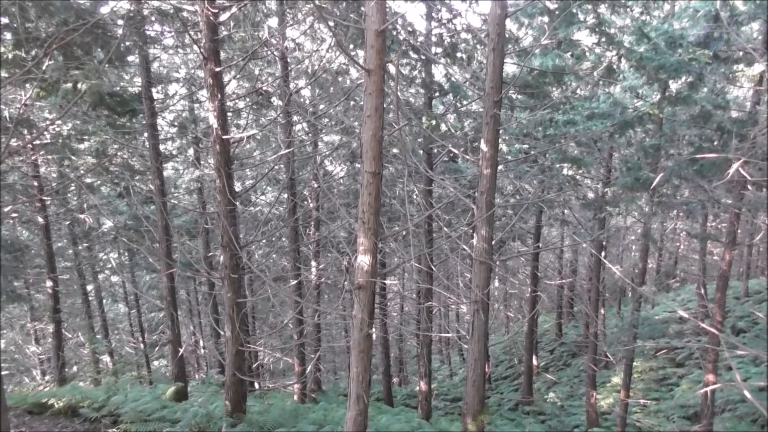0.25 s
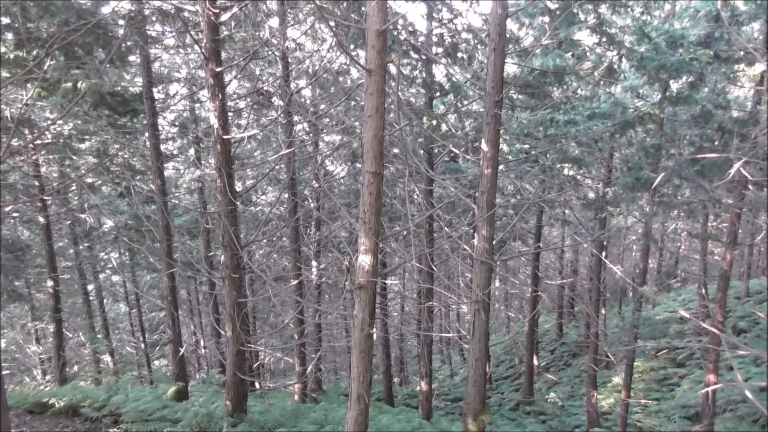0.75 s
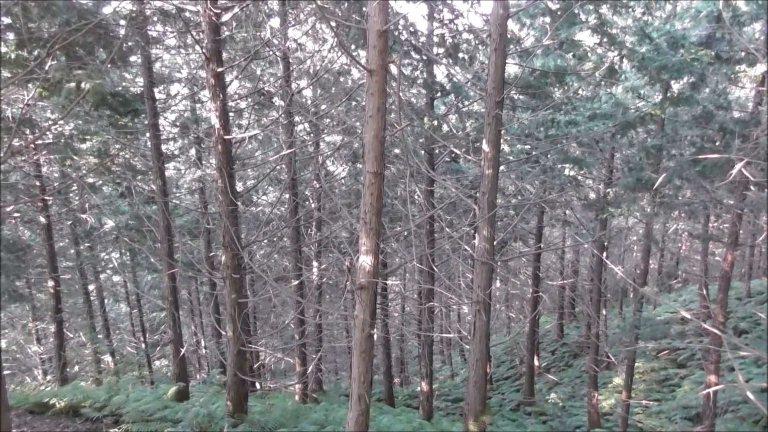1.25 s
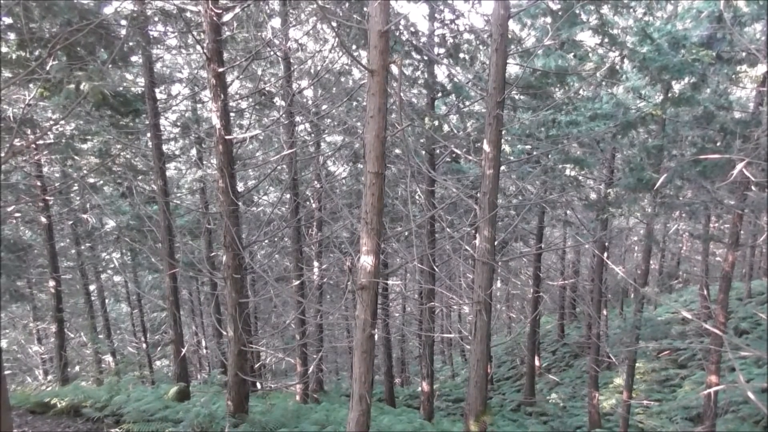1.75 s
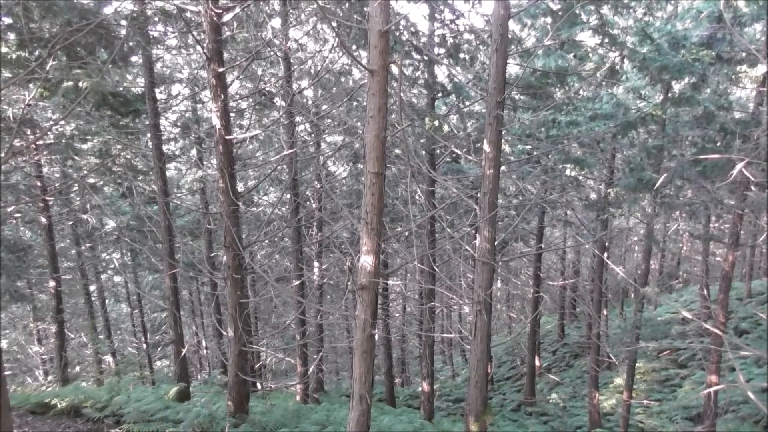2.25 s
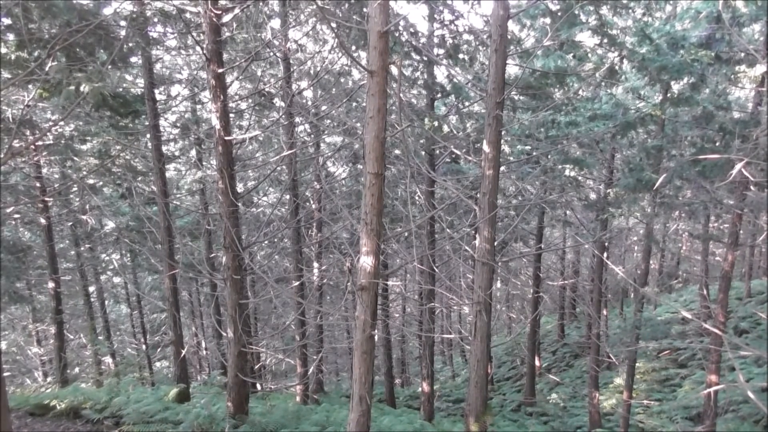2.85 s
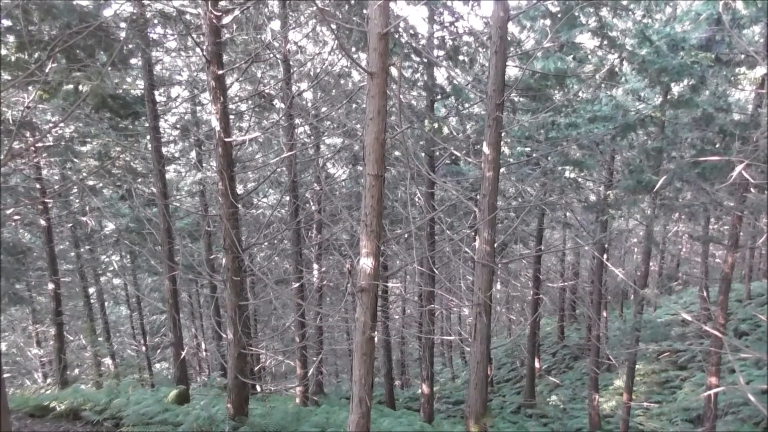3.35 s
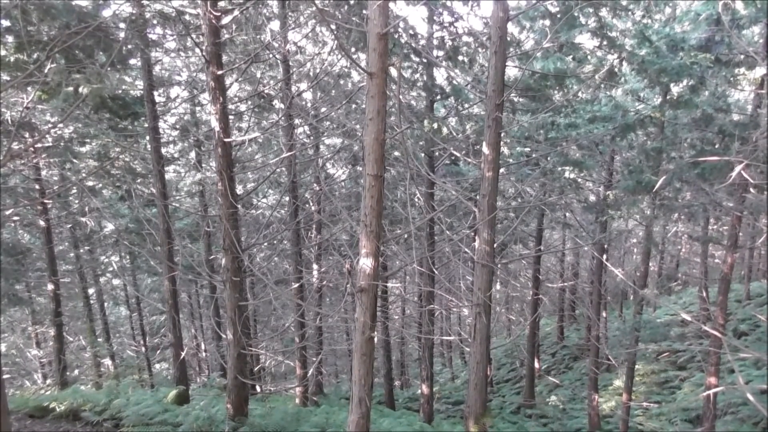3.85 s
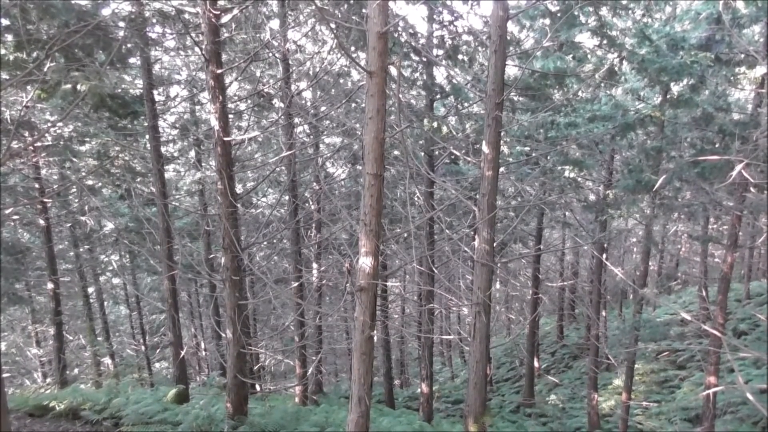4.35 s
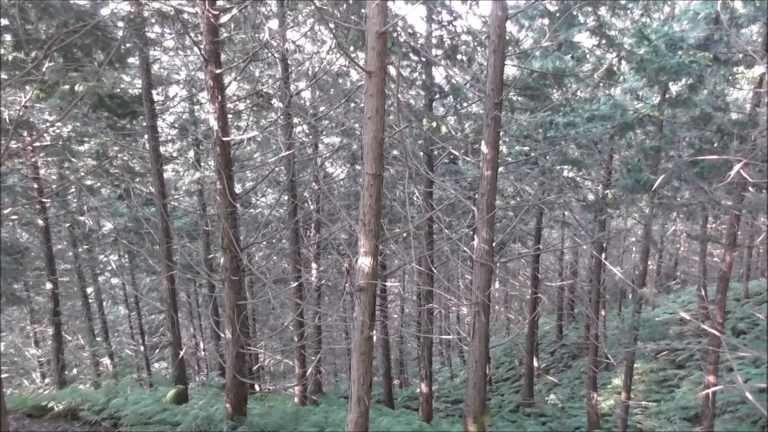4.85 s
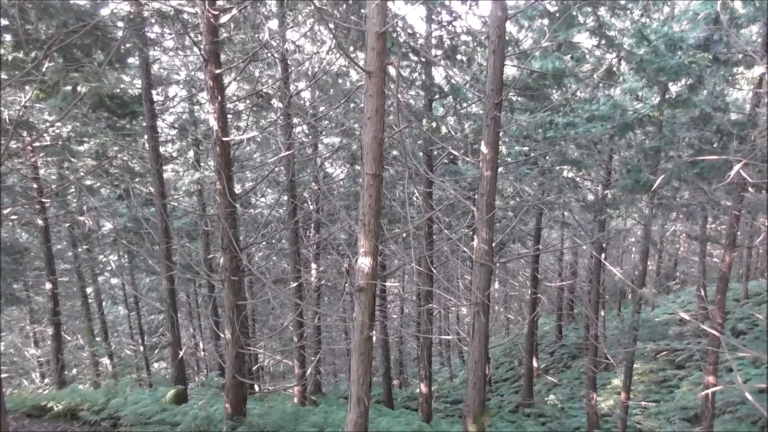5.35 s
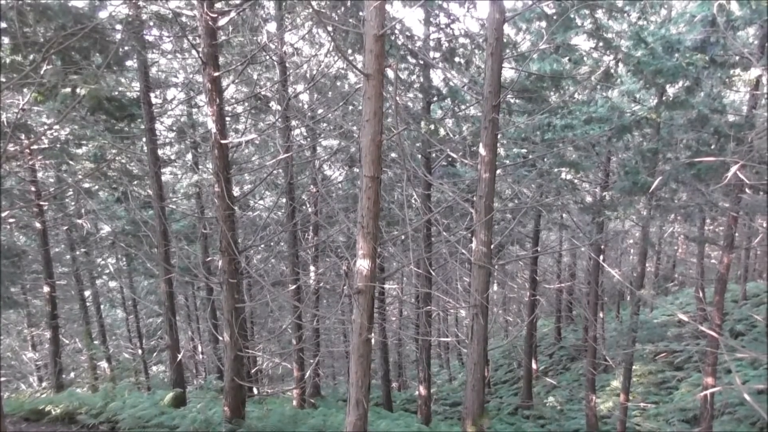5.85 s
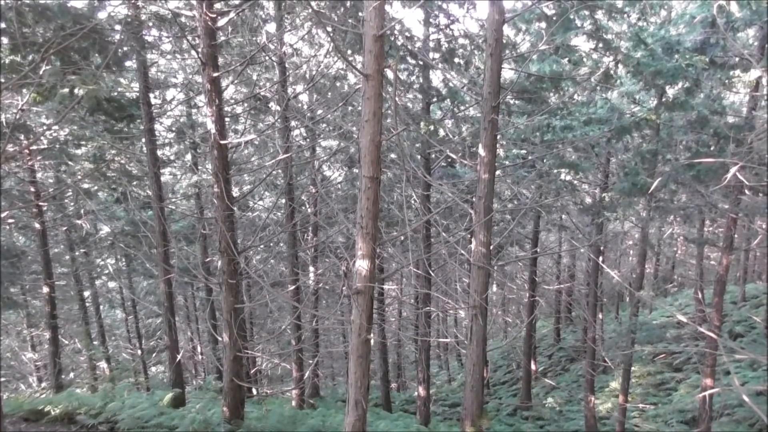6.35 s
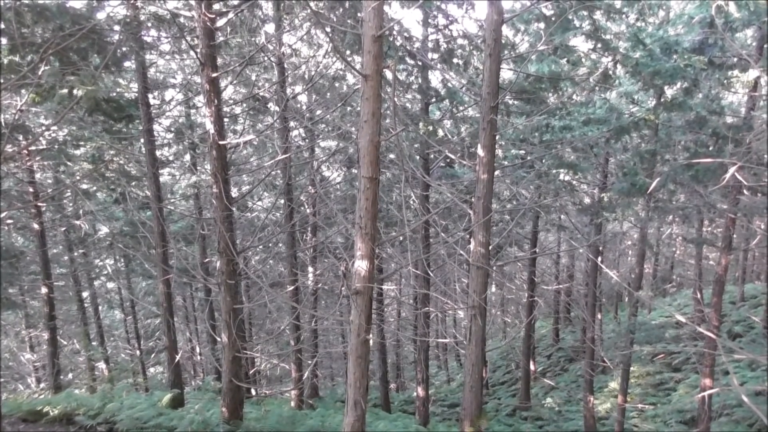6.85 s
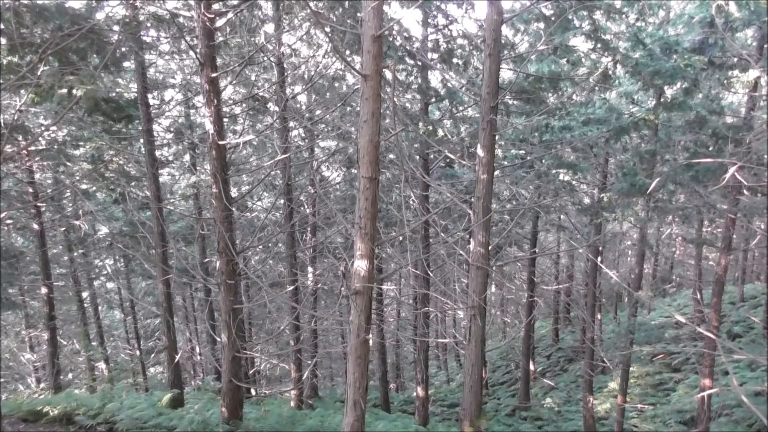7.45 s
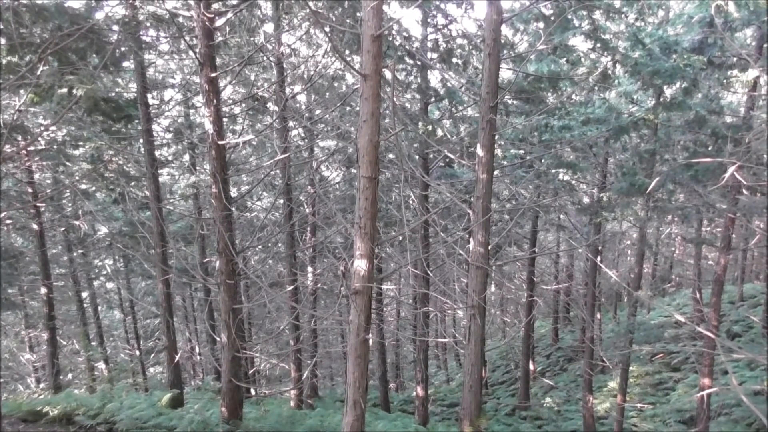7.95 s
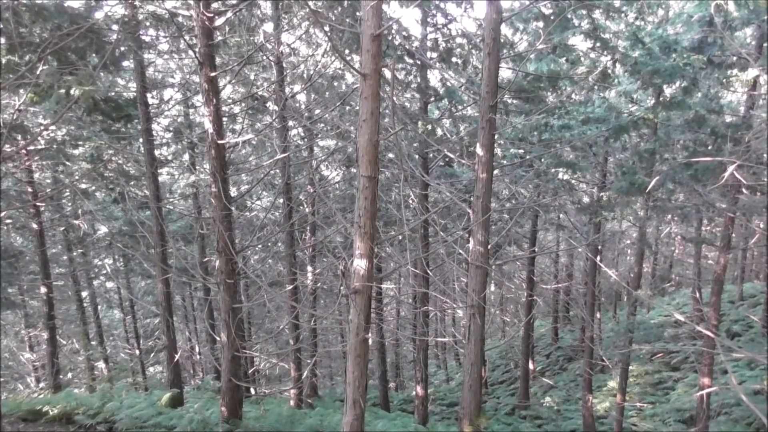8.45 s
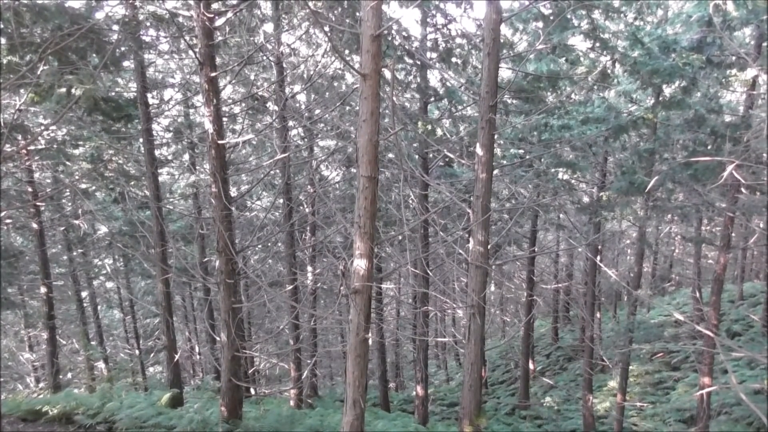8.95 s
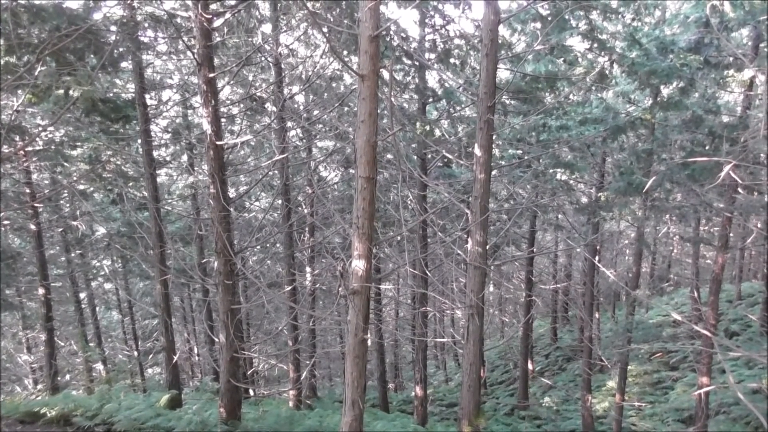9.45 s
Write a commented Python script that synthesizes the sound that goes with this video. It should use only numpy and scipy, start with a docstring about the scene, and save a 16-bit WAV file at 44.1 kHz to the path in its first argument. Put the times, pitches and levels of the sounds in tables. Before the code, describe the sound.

Cicadas in a conifer wood: a steady high sizzle, a throbbing distant chorus, and close raspy pulsing calls that overlap, swell and fade.

```python
"""A steady insect sizzle high above and a throbbing far chorus of cicadas open an evening in a conifer wood.
The sizzle is noise gated by fast clicks; the chorus sums pulsed partials of far males over coloured noise.
Near males overlap one another with ringing trains of about twelve syllables a second, each harmonic partials
with a tymbal rasp that scatters among the trunks. Filtered noise makes the low stir of air, and two drifting
sines make a distant engine that slowly climbs in pitch."""
import sys
import numpy as np
from scipy import signal
from scipy.fft import rfft, irfft, next_fast_len
from scipy.io import wavfile
from scipy.ndimage import uniform_filter1d, minimum_filter1d

SR = 44100
rng = np.random.default_rng(int(sys.argv[2]) if len(sys.argv) > 2 else 0)


def generate_wav(signal):
    """Clip the signal to [-1, 1] and save it as 16-bit WAV at the path in sys.argv[1]."""
    frames = np.transpose(np.atleast_2d(signal))
    scaled = np.clip(frames, -1, 1) * 32767
    pcm = np.round(scaled).astype(np.int16)
    wavfile.write(sys.argv[1], SR, pcm)


N = 427329  # samples


def amp(db):
    """Logarithmic level: 20 dB is a tenfold gain in amplitude."""
    return 10 ** (np.asarray(db) / 20)


def unit(x):
    """Normalization to equal power: rms 1 over all channels."""
    return x / np.sqrt(np.mean(x ** 2) + 1e-20)


def along(points, hz):
    """Interpolation of (frequency [Hz], value) points on a logarithmic frequency axis."""
    f, v = np.transpose(points)
    return np.interp(np.log(hz + 1), np.log(f + 1), v)


def shape(points, hz):
    """Spectral envelope: gain from (frequency [Hz], level [dB]), falling 60 dB an octave beyond its ends."""
    nearest = np.clip(hz, points[0][0], points[-1][0])
    octaves = np.abs(np.log2((hz + 1) / (nearest + 1)))
    return amp(along(points, hz) - 60 * octaves)


def curves(rows):
    """Temporal envelopes: one interpolated value per sample for each column after the time."""
    s, *cols = np.transpose(rows)
    return [np.interp(np.arange(N) / SR, s, c) for c in cols]


def wobble(rate, size=N):
    """Band-limited random modulation: a smooth curve through Gaussian knots, rate knots a second."""
    at = np.arange(size) * rate / SR
    k = at.astype(int)
    knots = rng.standard_normal(int(at[-1]) + 2)
    u = at - k
    return knots[k] + (knots[k + 1] - knots[k]) * u * u * (3 - 2 * u)


def filtered(x, response):
    """Linear filtering: the spectrum is multiplied by a response of frequency."""
    n = x.shape[-1]
    m = next_fast_len(n + SR // 10, True)
    spectrum = rfft(x, m)
    return irfft(spectrum * response(np.fft.rfftfreq(m, 1 / SR)), m)[..., :n]


def spread(pair):
    """Spatial coherence: two signals, as mid and side, make a diffuse field at closely spaced microphones."""
    # (frequency [Hz], side gain [dB])
    side_gain = [(25, 16), (60, 8.5), (130, 0.5), (500, 2.5), (1200, 0), (2100, -6), (3000, -43),
                 (4200, -12), (6000, -20), (8200, -10), (11000, 8)]
    side = filtered(pair[1], lambda hz: amp(along(side_gain, hz)))
    return np.array([pair[0] + side, pair[0] - side])


def wash(spectrum, gate=1):
    """Subtractive synthesis: two unrelated noises, gated, then coloured, at rms 1."""
    noise = gate * rng.standard_normal((2, N))
    return unit(filtered(noise, lambda hz: shape(spectrum, hz)))


def wood(x):
    """Reverberation by scattering among the trunks: two unrelated noise tails, each band decaying exponentially."""
    # Decay by 60 dB: (frequency [Hz], decay time [s])
    decay_time = [(500, 0.58), (4000, 0.53), (10000, 0.15)]
    hz, t, z = signal.stft(rng.standard_normal((2, SR // 2)), SR, nperseg=256)
    decay = amp(-60 * t / along(decay_time, hz)[:, None])
    tail = signal.istft(z * decay, SR, nperseg=256)[1]
    return signal.fftconvolve(x[None], tail / np.linalg.norm(tail[0]), axes=1)[:, :N]


def sizzle(level_db=-1, click_hz=520, depth=0.18, whine_db=-2, ripple_db=2.1):
    """Amplitude-modulated noise: the second species' fast tymbal clicks blur into a hiss with thin whining tones."""
    # Hiss colour: (frequency [Hz], level [dB])
    hiss_spectrum = [(3530, -45), (6000, -10.5), (6750, -4.5), (7950, 4), (8500, 3.5), (9040, -3.5),
                     (9250, -7.5), (10700, -21.5), (11100, -35), (14400, -27), (22000, -120)]
    # Hiss before the common gain: (time [s], level [dB])
    hiss_level = [(0.0, -19), (0.75, -17.5), (2.13, -17.5), (3.91, -21), (6.04, -19), (6.64, -20.5),
                  (8.07, -16.5), (9.36, -21), (9.69, -17.5)]
    # Thin tones, relative to the whine's level: (frequency [Hz], level [dB])
    whine_tones = [(8700, -56), (8819, -31), (9135, -48), (9224, -38.5), (9431, -41.5), (9624, -62),
                   (9755, -51)]
    # Whine before its common gain: (time [s], level [dB])
    whine_level = [(0, 7.5), (1.2, 7), (2.2, -3.5), (4.5, -5), (6, 3), (7.5, -5), (9.69, -14)]

    click_phase = 2 * np.pi * np.cumsum(click_hz + 12 * wobble(3)) / SR
    gate = amp(0.31 * wobble(700)) * (1 + depth * np.sin(click_phase))
    hiss_db = curves(hiss_level)[0] + level_db + 0.54 * wobble(24)
    hiss = amp(hiss_db) * wash(hiss_spectrum, gate)
    # Echoes from the trunks leave a fixed fine ripple on the spectrum.
    ripple_hz, ripple = np.linspace(0, SR / 2, 500), rng.standard_normal(500)
    hiss = filtered(hiss, lambda hz: amp(ripple_db * np.interp(hz, ripple_hz, ripple)))

    whine = np.zeros((2, N))
    for hz, db in whine_tones:
        phase = 2 * np.pi * np.cumsum(hz + 14 * wobble(60)) / SR
        whine += amp(db + 0.91 * wobble(8.9)) * np.array([np.sin(phase), np.cos(phase)])
    return hiss + amp(curves(whine_level)[0] + whine_db) * whine


def far_males(count=7, centre_hz=4200, spread_hz=170, syllable_rate=12.2):
    """Superposition of incoherent sources: two partials of distant males, each throbbing at his own pace."""
    lower, upper = np.zeros(N), np.zeros(N)
    for place in np.linspace(-1, 1, count):
        beat = rng.random() + np.cumsum(syllable_rate + 0.608 * wobble(.7)) / SR
        gate = np.sin(np.pi * beat) ** 6 * amp(2.2 * wobble(.8))
        upper_hz = centre_hz + spread_hz * place + 30 * wobble(1.5)
        # The lower partial lies an octave beneath.
        phase = np.pi * np.cumsum(upper_hz) / SR + .5 * wobble(300)
        lower += gate * np.sin(phase)
        upper += gate * np.sin(2 * phase)
    # The dry voices lie mostly in the mid channel; the wood fills both.
    return [unit(unit(x) * [[1], [.5]] + .5 * unit(wood(x))) for x in (lower, upper)]


def chorus(lower_wash_db=-2.0, lower_voices_db=-4.5, upper_wash_db=-4.5, upper_voices_db=-3, buzz_gain_db=3.0):
    """Central-limit blending: distant males stand over still farther ones that merge into coloured noise."""
    # Before the wash and voice gains: (time [s], lower partial level [dB], upper partial level [dB])
    partial_levels = [(0, -29.5, -24), (.43, -30.5, -26), (1.78, -36, -29.5), (2.08, -31, -26),
                      (2.5, -27, -20), (3.48, -29, -23), (4.3, -30.5, -25), (5.26, -34.5, -31.5),
                      (5.96, -32.5, -27.5), (6.69, -30, -21.5), (7.99, -24.5, -19.5), (8.58, -26.5, -20.5),
                      (9.26, -32.5, -21.5), (9.69, -28, -20)]
    # Before the buzz gain: (time [s], level [dB])
    buzz_level = [(0.0, -35), (0.7, -37.5), (2.53, -31), (3.83, -36.5), (8.12, -28.5), (9.07, -32.5),
                  (9.69, -31.5)]
    # Noise colours, each (frequency [Hz], level [dB])
    lower_spectrum = [(1300, -85), (1600, -28), (1850, -8), (1950, -11.5), (2050, -2), (2170, 1.5),
                      (2300, -9), (2500, -19.5), (2800, -22), (3300, -22), (3600, -51)]
    upper_spectrum = [(3350, -38), (3600, -18), (3800, -5.5), (4020, -3), (4300, 1), (4500, -7),
                      (4750, -13), (5100, -18.5), (6000, -45)]
    buzz_spectrum = [(4400, -32), (4900, -9.5), (5350, -5), (5500, 2.5), (5700, -3), (6050, 5.5), (6500, 4),
                     (7200, -17), (8000, -42)]

    lower_db, upper_db = curves(partial_levels)
    buzz_db, = curves(buzz_level)
    lower_voices, upper_voices = far_males()
    throb = amp(.6 * wobble(32))
    lower = amp(lower_wash_db) * throb * wash(lower_spectrum) + amp(lower_voices_db) * lower_voices
    upper = amp(upper_wash_db) * throb * wash(upper_spectrum) + amp(upper_voices_db) * upper_voices
    buzz = amp(buzz_db + buzz_gain_db) * wash(buzz_spectrum)
    return amp(lower_db) * lower + amp(upper_db) * upper + buzz


def air(rumble_db=3, stir_db=2, split_hz=160):
    """Turbulence as coloured noise: low rumble on the microphones and a soft stir in the crowns."""
    # Common colour: (frequency [Hz], level [dB])
    air_spectrum = [(12, -35), (20, -5), (91, -1.5), (120, -4), (163, -1.5), (195, -3), (285, -8),
                    (545, -10), (728, -15), (1370, -21), (1500, -18.5), (1950, -13), (3300, -120)]
    # Before the two gains: (time [s], rumble level [dB], stir level [dB])
    air_levels = [(0.0, -48, -49.5), (0.67, -55, -46.5), (1.51, -48, -43), (2.67, -52.5, -47),
                  (3.05, -57, -51), (5.56, -50, -48), (6.5, -52.5, -48), (7.99, -51, -46.5),
                  (8.45, -45, -47), (8.8, -52.5, -47.5), (9.36, -53, -52), (9.69, -55, -50.5)]
    rumble, stir = curves(air_levels)
    lowpass = lambda hz: 1 / (1 + (hz / split_hz) ** 4)
    low = unit(filtered(wash(air_spectrum), lowpass))
    high = unit(filtered(wash(air_spectrum), lambda hz: 1 - lowpass(hz)))
    return amp(rumble + rumble_db) * low + amp(stir + stir_db) * high


def engine(level_db=-1, third_db=-12):
    """Rotational orders: a far engine drones on its second and third harmonics, fading in and out."""
    start_hz, climb_hz_per_s = 119.2, 5.78  # of the second order
    # Before the common gain: (time [s], level [dB])
    engine_level = [(0, -72), (2.2, -56), (4.2, -53.5), (5.4, -45.5), (6.3, -56), (7.2, -47), (8.2, -43.5),
                    (9.69, -49)]
    db, = curves(engine_level)
    second_hz = start_hz + climb_hz_per_s * np.arange(N) / SR
    phase = np.pi * np.cumsum(second_hz) / SR  # of the first order

    def drone():
        """Additive synthesis: two orders with slowly wandering phase and a common random level."""
        flutter = amp(1.9 * wobble(3.2))
        second = np.sin(2 * phase + wobble(0.933))
        third = np.sin(3 * phase + wobble(2.8))
        return flutter * (second + amp(third_db) * third)

    return amp(db + level_db) * np.array([unit(drone()), 0.33 * unit(drone())])


def syllables(first, last, count, falter, settle, pitch_hz, climb_hz, sag_hz, level_db, swell_db, fade_db):
    """Muscular warming and fatigue: a call swells and climbs, holds, then slows, sags and fades as the male tires."""
    slowing_s, falter_syllables = .0008, 1.5
    sag_power, fade_power = 3.5, 5.5  # how late in the call pitch and level give way
    scatter_hz, scatter_db = 9, 0.67  # from syllable to syllable
    k = np.arange(round(count))
    progress = k / k[-1]
    warming = np.exp(-(k / settle) ** 2)
    # Each interval outlasts the one before by slowing_s, and the last few drag further.
    drag = falter * np.exp((k[1:] - k[-1]) / falter_syllables)
    lag = np.append(0, np.cumsum(slowing_s * k[:-1] + drag))
    times = first + (last - first - lag[-1]) * progress + lag
    chance = rng.standard_normal((len(k), 2))
    pitches = pitch_hz - climb_hz * warming - sag_hz * progress ** sag_power + scatter_hz * chance[:, 0]
    levels = level_db - swell_db * warming ** 2 - fade_db * progress ** fade_power + scatter_db * chance[:, 1]
    return times, pitches, levels


def call(train, length, partials_db, brighten_db, fall_hz, rasp_db, tilt_db, side_hz, side_db,
         arch_hz=22, settle=5, opening_ring_db=6, opening_tone_db=-4, jitter=1, shorter=.3):
    """Driven tymbal resonance: short, hoarse syllables that slide down give way to clear, slightly arched tones."""
    # Rasp colour before the voice's tilt: (frequency [Hz], level [dB])
    rasp_spectrum = [(1400, -35), (1900, -2.5), (2200, 3.5), (2550, -3.5), (2900, -4.5), (3450, -14.5),
                     (3850, -14), (4400, 3.5), (4700, 6.5), (5050, 2.5), (5600, -8.5), (6400, -14.5),
                     (8400, -7), (10600, -21), (12000, -50)]
    times, pitches, levels = train
    n = round((times[-1] - times[0] + .2) * SR)
    start = round((times[0] - .1) * SR)
    t = (start + np.arange(n)) / SR
    which = np.searchsorted((times[1:] + times[:-1]) / 2, t)  # nearest syllable
    opening = np.exp(-(which / settle) ** 2)
    half_length = length / 2 * (1 - np.clip(shorter * opening, 0, .7))
    u = np.clip((t - times[which]) / half_length, -1, 1)  # position within the syllable
    swell = amp(levels[which]) * np.cos(np.pi / 2 * u * u)

    # Pitch is that of the second partial, so the lowest runs at half of it.
    second_hz = pitches[which] - fall_hz * opening * u - arch_hz * u * u
    phase = 2 * np.pi * np.cumsum(second_hz) / (2 * SR)
    phase += (.06 + .24 * opening) * wobble(450, n)
    bright = amp(brighten_db * np.linspace(-.5, .5, n))
    tone = np.zeros(n)
    for k, db in zip((2, 1, 3, 4, 5), (0, *partials_db)):
        # High partials follow the uneven ribs most, so their lines are the fuzziest.
        fuzz = 2 * np.pi * rng.random() + .045 * k * k * wobble(300, n)
        tone += np.sqrt(2) * amp(db) * (bright if k > 2 else 1) * np.sin(k * phase + fuzz)

    # The tymbal ribs buckle once in seven cycles of the lowest partial, a little unevenly.
    ribs = np.floor((phase + jitter * wobble(300, n)) / (2 * np.pi * 7))
    clicks = np.diff(ribs, prepend=ribs[0]) * amp(1.5 * rng.standard_normal(n))
    # Near scattering smears each click.
    twigs = rng.standard_normal(SR // 250) * np.linspace(1, 0, SR // 250)
    colour = lambda hz: shape(rasp_spectrum, hz) * amp(tilt_db * np.log2((hz + 1) / side_hz))
    rasp = unit(filtered(signal.fftconvolve(clicks, twigs, "same"), colour))
    ring = unit(filtered(clicks, lambda hz: 1 / (1 + 1j * (hz - side_hz) / 150) ** 3))

    voice = amp(opening_tone_db * opening ** 2) * tone
    voice += amp(rasp_db) * rasp
    voice += amp(side_db + opening_ring_db * opening) * ring
    return np.pad(swell * voice, (start, N))[:N]


def near_males(level_db=1):
    """Direct and reverberant sound: each male sings from his own tree, and the wood answers."""
    # One call for each male: (first syllable [s], last syllable [s], syllables [count],
    # last interval's extra [s], syllables to reach full voice [count], full pitch of second partial [Hz],
    # opening climb [Hz], closing sag [Hz], full level before the common gain [dB],
    # opening softer by (louder if negative) [dB], closing fade [dB])
    calls = [ (.915, 2.064, 15, .004, 2.3, 4535, 157, 55, -29.5, 2, 7.6),
             (1.228, 1.964, 10, .002, 2.34, 4270, 8.7, 9, -27.5, 0, 3),
             (2.06, 3.43, 18, 0.022, 4.36, 4327, 135, 165, -15.5, 6, 12),
             (2.23, 3.721, 19, 0.027, 4.76, 4110, 224, 89, -14, 2.5, 5.47),
             (2.703, 3.661, 12, 0.029, 2.5, 4395, 55, 60, -22, 6, 6),
             (5.256, 6.249, 13, .002, 2.37, 4638, 230, 13, -24, 1.5, 6),
             (5.482, 6.743, 16, .014, 4.1, 4512, 210, 72, -14, 15, 5.8),
             (5.82, 6.402, 8, .002, 1.5, 4240, 115, 60.3, -23.5, -5, 13),
             (7.04, 8.367, 17, .02, 2.14, 4160, 10.8, 216, -24.5, -2, 0.51),
             (8.518, 9.646, 15, 0.0082, 4.34, 4165, 225, 41.6, -17, -3, 0.1),
             (8.725, 9.695, 13, .002, 2.26, 4344, 95, 40, -22, 2, 2.4)]
    # Voices of the same males: (full syllable length [s], partials 1, 3, 4, 5 at mid-call relative to 2 [dB],
    # brightening of partials 3 to 5 over the call [dB], opening fall from mid-syllable to end [Hz],
    # rasp [dB], rasp tilt [dB per octave], side resonance [Hz], its level [dB],
    # pan, left over right [dB], send to the wood [dB])
    voices = [ (.052, (-10.5, -18, -10, -48), 0, 19, -11, 0, 3900, -12, 4, -12), (.05, (-28, -22, -10, -37),
              0, 18, -14, 3, 4050, -19, 5, -7), (.038, (-10, -15.5, -5, -28),
              24, 19.7, -14, 5, 4660, -12, 0.5, -17), (.041, (-13.5, -13, -24, -24),
              10, 70, -17.5, 1.5, 3790, -16, 0.9, -12), (.054, (-5.5, -18, -17, -24),
              8, 20, -11, -3, 4250, -8, -1, -17), (0.0454, (-11.5, -24, -21, -24),
              19, 22, -15, 1, 4400, -10.5, 1.5, -15), (.043, (-12.5, -14, -26, -29),
              7, 40, -9.5, 4, 5080, -20, 4, -11), (0.0455, (-19, -14, -3, -21),
              -5, 31.4, -15, 4, 3950, -22, 5, -6.5), (0.041, (-10.5, -16, -15, -19),
              -10, 30, -20, 7, 4300, -7, 3.5, -9.5), (.043, (-9.5, -10.5, -9.5, -22.5),
              11, 55, -15.5, -5, 4330, -11, -1, -39), (.047, (-2, -2.5, 2.5, -14),
              -6, 20, -7.5, -2, 4000, -10, -1.2, -14)]
    direct, send = np.zeros((2, N)), np.zeros(N)
    for row, (*voice, pan_db, wood_db) in zip(calls, voices):
        song = amp(level_db) * call(syllables(*row), *voice)
        direct += amp([[pan_db / 2], [-pan_db / 2]]) * song
        send += amp(wood_db) * song
    return direct, wood(send)


def scene(chorus_pan_db=0.2, sizzle_pan_db=-0.25):
    """Level-difference panning: near males stand out of a diffuse field; chorus leans left, sizzle right."""
    lean = lambda db: amp([[db], [-db]])
    far = spread(sizzle()) * lean(sizzle_pan_db) + spread(chorus()) * lean(chorus_pan_db)
    background = air() + engine()
    direct, echoes = near_males()
    return direct + far + spread(echoes + background)


def record(dry):
    """Peak limiting and band limiting: smoothed gain reduction holds the loudest peaks, then a steep low-pass."""
    top_hz = 11300
    needed = np.minimum(1, .96 / (np.abs(dry).max(axis=0) + 1e-9))
    gain = minimum_filter1d(needed, size=800)
    gain = uniform_filter1d(uniform_filter1d(gain, size=400), size=400)
    return filtered(dry * gain, lambda hz: 1 / (1 + (hz / top_hz) ** 100))


dry = scene()
out = record(dry)
generate_wav(out)
```